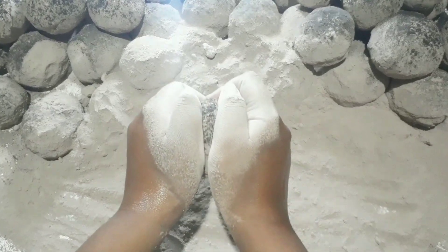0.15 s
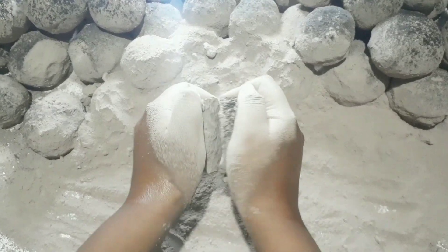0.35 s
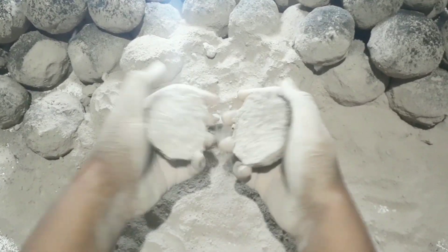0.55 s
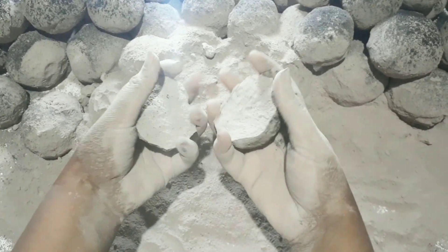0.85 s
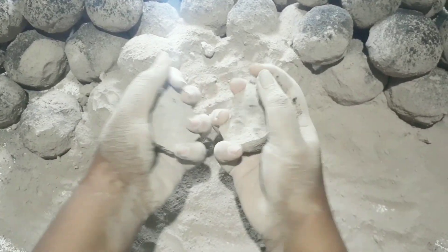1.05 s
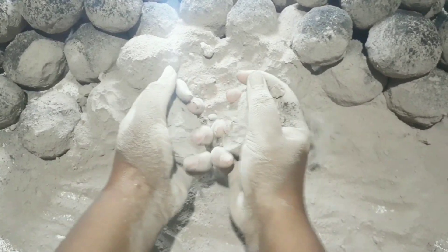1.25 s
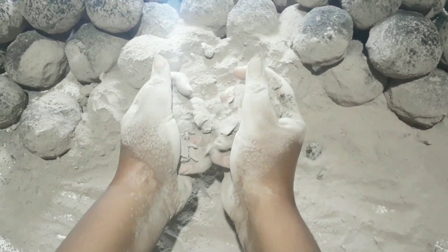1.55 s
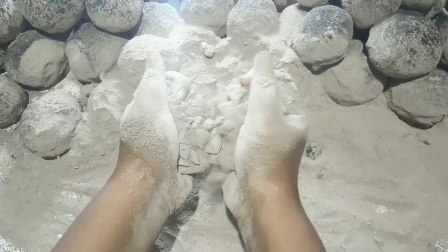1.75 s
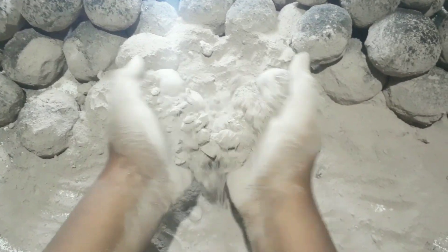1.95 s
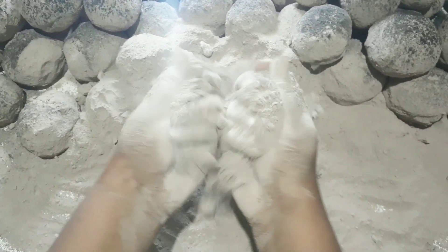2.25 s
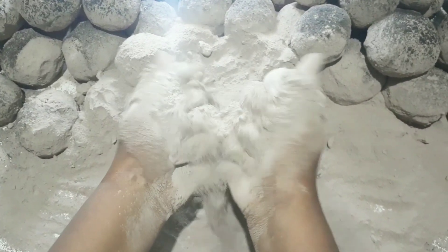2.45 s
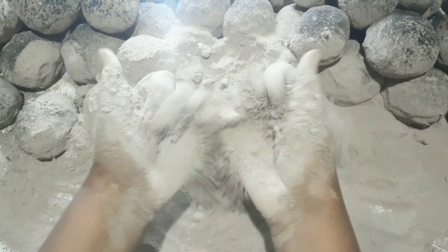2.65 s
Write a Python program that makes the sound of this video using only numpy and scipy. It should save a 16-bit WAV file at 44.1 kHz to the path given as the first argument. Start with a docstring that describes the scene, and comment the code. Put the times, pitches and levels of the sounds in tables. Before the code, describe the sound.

Dry chalk broken with a soft low thud and crushed to crumbs while a cricket chirps fast

```python
"""In a small, echoing space with a soft hiss, hands break a chalk ball with a dull thump, then crush the halves.
Cracks and falling crumbs are noise pulses that ring the resonances of hands, chalk and heap, with powdery hiss.
Decaying noise makes the boom of the split, and a band of grainy noise makes a brief high rustle.
A cricket chirps steadily close by and others trill further off: short sine bursts that sag in pitch.
"""
import sys
import numpy as np
from scipy import signal
from scipy.fft import rfft, irfft, next_fast_len
from scipy.io import wavfile

SR = 44100
rng = np.random.default_rng(int(sys.argv[2]) if len(sys.argv) > 2 else 0)


def wav_record(signal):
    """Record a signal, one row per channel, as 16-bit PCM in the file named by sys.argv[1]."""
    frames = np.transpose(np.atleast_2d(signal))
    bounded = np.clip(frames, -1, 1)
    # unit amplitude maps onto the largest positive 16-bit level
    quanta = np.round(bounded * 32767).astype(np.int16)
    wavfile.write(sys.argv[1], SR, quanta)


N = 123479  # length in samples

# Separate cracks: t/s, then relative level/dB of dust, thud, knock, crunch, crisp
CRACKS = [(0.201, -2, -7, -15.5, -28, -59), (0.997, -27, -48, -44, -46.5, -50.5),
          (1.095, -17, -32, -33.5, -51, -56), (1.13, -17, -27.5, -46, -33.5, -48),
          (1.151, -23, -33, -54, -41.5, -43), (1.268, -10, -21, -29, -27.5, -37),
          (1.327, -6, -28.5, -30, -25.5, -41), (1.407, -15, -25, -28.5, -32, -33),
          (1.48, -22.5, -30, -33, -34.5, -33), (1.509, -12, -33, -35, -33, -36),
          (1.625, -35, -24, -20, -27, -25), (1.654, 2, -23, -35, -33, -39),
          (1.885, -5, -28.5, -26.5, -28.5, -41), (1.919, -23, -39, -24.5, -47, -47.5),
          (1.969, -1, -42, -30.5, -34.5, -32), (2.026, -17.5, -38.5, -38, -33.5, -30.5),
          (2.059, -17, -58, -47, -29, -38), (2.119, -9, -49, -39, -29.5, -40.5),
          (2.151, -15, -44, -27, -24, -49), (2.235, -14, -48, -44, -37, -28.5),
          (2.276, -16, -44, -46, -36, -24.5), (2.298, -3, -60, -21, -21.5, -38),
          (2.375, -4, -29.5, -20, -17, -37), (2.441, -8, -63, -24, -28, -22),
          (2.459, 8, -60, -37, -30.5, -34.5), (2.485, -9, -48, -35, -44, -29.5),
          (2.534, -18.5, -49, -26.5, -43, -32), (2.565, 3, -31, -30, -35, -33),
          (2.599, -36, -29, -47, -43, -42), (2.707, -22, -46, -33.5, -39, -53),
          (2.759, -27, -51, -45, -37, -56)]
# Stream of falling crumbs: t/s, then relative level/dB of thud, knock, crunch, crisp
CRUMBLE = [(0.6, -62.5, -73, -76, -75), (0.62, -57, -71, -66, -56.5), (0.75, -61, -59, -52.5, -55.5),
           (0.98, -62, -64, -74, -63.5), (1.0, -46, -57, -53, -42), (1.07, -52, -73, -75, -76),
           (1.09, -34, -37, -51, -58), (1.15, -35, -40.5, -40, -46.5), (1.25, -43, -54, -66, -61),
           (1.27, -40.5, -25.5, -34.5, -26.5), (1.45, -34, -44, -38.5, -50.5),
           (1.51, -26, -46, -24.5, -27.5), (1.6, -54, -40, -47.5, -48), (1.63, -22, -19, -25, -27),
           (1.68, -33.5, -35.5, -40.5, -40.5), (1.79, -43, -42, -48.5, -34), (1.87, -55, -47, -41, -40.5),
           (1.88, -39, -33, -37, -34.5), (2.04, -43, -40.5, -42, -36), (2.18, -48, -31, -31.5, -42.5),
           (2.27, -38, -42, -45, -42), (2.29, -62, -29.5, -25, -31), (2.39, -31, -21.5, -24, -35),
           (2.42, -50, -52, -58, -35), (2.44, -37.5, -29, -28, -31.5), (2.64, -37, -39, -35, -37.5),
           (2.77, -41.5, -30, -46.5, -48.5), (2.8, -50, -49, -43, -62)]
# Resonances of hands, chalk and heap, grouped as thud, knock, crunch, crisp: f/Hz, width/Hz, relative level/dB
BODY = [
    [(90, 50, -9.5), (164.6, 42, 0.5), (225, 54.7, 0.5), (290, 60, -8)],
    [(356, 110, 1), (478, 97, 8), (609, 136, 1)],
    [(694.4, 187, 6.5), (952, 165, 5.5), (1232, 167, 2)],
    [(1404, 276, 4), (1845, 129, 3.5), (1990, 254, -2)],
]
# Boom as the ball splits, one row per resonance group: level/dB, time to fall 60 dB: t60/s
BOOM = [(-18, 0.66), (-25.5, 0.42), (-38.5, 0.17), (-51, .2)]
# Brief high rustle: t/s, level/dB
RUSTLE = [(2.25, -66), (2.28, -42), (2.4, -42), (2.46, -67.5), (2.8, -62)]
# Echo of the space: f/Hz, time to fall 60 dB: t60/s
ROOM = [(60, .7), (170, .4), (480, .35), (1000, .2), (2500, 0.31), (7000, .15)]
# Chirps of the near cricket: t/s, main level/dB, lead-in stroke level/dB
CHIRPS = [(0.0857, -20.5, -35), (0.2064, -20, -30), (0.327, -21, -29), (0.4466, -21, -26),
          (0.5648, -20.5, -30), (0.687, -21, -36), (0.8124, -19.5, -28), (0.9383, -23, -25),
          (1.0593, -22.5, -25), (1.1778, -22, -34), (1.2968, -21, -32), (1.4123, -19, -28),
          (1.5304, -19, -28.5), (1.6495, -20.5, -29.5), (1.7683, -20.5, -28), (1.891, -21.5, -29),
          (2.0128, -20, -34), (2.1498, -23, -32.5), (2.283, -21, -27.5), (2.4074, -20.5, -30),
          (2.534, -22, -26), (2.6528, -21, -29), (2.7737, -20, -28)]
# Lead-in stroke: t/s after the chirp time, length/s, sag/Hz
LEAD_IN = (-.021, .009, 500)
# Main stroke and its drawn-out aftersound: t/s after the chirp time, length/s, level/dB over the chirp, sag/Hz
STROKES = [(-.002, 0.0091, -0.5, 700), (.011, .018, -8.5, 100), (.022, .019, -11, 200),
           (.06, .02, -22, 200)]
# Pitches of the far crickets, one each: f/Hz
CHORUS_HZ = (6340, 6440, 6500, 6670)
# Tone colour of the background hiss: f/Hz, relative level/dB per Hz
HISS = [(18, -52.5), (30, -39), (50, -7.5), (127, -9), (160, -17.5), (450, -22.5), (900, -27.5),
        (2000, -29), (2800, -30), (4500, -27), (5800, -18.5), (7300, -18), (9800, -19.5), (10200, -23.5),
        (11500, -24), (11900, -28.5), (16000, -28.5)]
# Slow swell of the hiss: t/s, relative level/dB
AIR = [(0.0, -45.5), (0.6, -46.5), (1.04, -45), (2.34, -45.5), (2.5, -45), (2.8, -46.5)]
# How alike left and right are in the hiss: f/Hz, likeness (1 = same)
ALIKE = [(60, 1), (270, 0.99), (740, 0.4), (2000, 0.29), (3300, 0.24), (6000, 0.82), (9000, 0.47),
         (15000, 0.089)]

CRACK_DELAY_S = .003  # each crack sounds this long after its listed time
CRACK_DB, SPLINTERS_DB = 25, -9  # a crack sets off a short burst of splinters
SPLINTERS_S = 0.0069  # the splinters fall 9 dB in this time
GRAINS_PER_S, GRAIN_SPREAD_DB, CRUMBLE_DB = 1600, 2.5, -4.5
POWDER_HZ, POWDER_DB, POWDER_T60_S = 3000, -36, .151  # hiss above this frequency at each crack
BOOM_S, BOOM_HOLD_S = .212, 0.038  # start, and time before it dies away
RUSTLE_HZ, RUSTLE_WIDTH_HZ = 4850, 730
WING_HZ, SAG_POWER = 6675, 6  # a high power keeps the pitch drop at the very end of a stroke
STROKE_SCATTER_DB, STROKE_SCATTER_S = 1.5, .001
CHORUS_PER_S, CHORUS_SPREAD_HZ, CHORUS_SAG_HZ, CHORUS_DB = 96, 8, 200, -40.5
HISS_DB = -41
ROOM_DB, CRICKET_WET_DB = 7, 3  # echo level for the hands and for the near cricket
WIDTH_DB, CRICKET_WIDTH_DB = -18, -9  # left-right difference fed to the echo, hands and cricket
TOP_HZ = 15840


def amp(db):
    """Turn decibels into a plain factor."""
    return 10 ** (np.asarray(db) / 20)


def unit(x):
    """Scale to an average (RMS) level of 1."""
    return x / np.sqrt(np.mean(x ** 2) + 1e-20)


def along(points, hz):
    """Read a curve of (f/Hz, value) points on a log frequency axis."""
    f, v = np.transpose(points)
    return np.interp(np.log(hz + 1), np.log(f + 1), v)


def over_time(points, **ends):
    """Read a curve of (t/s, value) points at every sample."""
    return np.interp(np.arange(N) / SR, *np.transpose(points), **ends)


def filtered(x, response):
    """Multiply the spectrum of x by a complex response of frequency."""
    m = next_fast_len(N + SR // 2)
    return irfft(rfft(x, m) * response(np.fft.rfftfreq(m, 1 / SR)), m)[..., :N]


def ring(modes):
    """Resonances that ring after each push, with steep skirts; white noise keeps its level."""
    low_hz, high_hz = .6 * modes[0][0], 1.2 * modes[-1][0]

    def response(f):
        # neighbouring resonances have opposite signs
        peaks = sum((-1) ** k * amp(db) * 1j * f * width / (hz * hz - f * f + 1j * f * width)
                    for k, (hz, width, db) in enumerate(modes))
        low_cut = 1j * f / (low_hz + 1j * f)
        high_cut = 1 / (1 - np.square(f / high_hz) + np.sqrt(2) * 1j * f / high_hz)
        steep = peaks * np.square(low_cut * high_cut)
        return steep / np.sqrt(np.mean(abs(steep) ** 2))

    return response


def chalk():
    """Cracks and a stream of crumbs excite four groups of resonances; powder hisses at each crack."""
    s = np.arange(SR // 16) / SR
    sizes = amp(GRAIN_SPREAD_DB * rng.exponential(size=N)) * rng.choice([-1, 1], N)
    grains = unit(sizes * (rng.random(N) < GRAINS_PER_S / SR))
    at, *flow_db = np.transpose(CRUMBLE)
    pushes, powder = np.zeros((4, N + len(s))), np.zeros(N + len(s))
    for push, db in zip(pushes, flow_db):
        level_db = over_time(np.transpose([at, db]), left=db[0] - 30)
        push[:N] = grains * amp(CRUMBLE_DB + level_db)
    for at, dust_db, *levels_db in CRACKS:
        i = round((at + CRACK_DELAY_S) * SR)
        sparse = rng.standard_normal(len(s)) * (rng.random(len(s)) < .03)
        burst = amp(SPLINTERS_DB - 9 * s / SPLINTERS_S) * sparse
        burst[0] = -1  # the crack itself
        pushes[:, i:][:, :len(s)] += amp(np.add(levels_db, CRACK_DB))[:, None] * burst
        fade = amp(dust_db + POWDER_DB - 60 * s / POWDER_T60_S)
        powder[i:][:len(s)] += fade * rng.standard_normal(len(s))
    dust = filtered(powder[:N], lambda f: (1j * f / (POWDER_HZ + 1j * f)) ** 2 / (1 + 1j * f / 8000) ** 2)
    return dust + sum(filtered(push[:N], ring(modes)) for push, modes in zip(pushes, BODY))


def boom():
    """Noise in the same resonances holds, then dies away; the lowest group lasts longest."""
    t = np.arange(N) / SR - BOOM_S
    noise = rng.standard_normal(N) * (t > 0)
    dying_s = np.maximum(t - BOOM_HOLD_S, 0)
    return sum(filtered(noise * amp(db - 60 * dying_s / t60), ring(modes))
               for (db, t60), modes in zip(BOOM, BODY))


def rustle():
    """Sparse random clicks, narrowed to one high band, make a grainy noise."""
    clicks = rng.standard_normal(N) * (rng.random(N) < .05)
    band = filtered(clicks, lambda f: 1 / (1 + ((f - RUSTLE_HZ) / RUSTLE_WIDTH_HZ) ** 2) ** 2)
    return amp(over_time(RUSTLE, left=-90)) * unit(band)


def strokes(rows):
    """Each wing stroke (t/s, length/s, level/dB, f/Hz, sag/Hz) is a sine burst that sags at its end."""
    out = np.zeros(N + 2 * SR)  # a spare second at both ends
    for at, length, db, hz, sag_hz in rows:
        i = round(at * SR)
        u = np.arange(round(length * SR)) / (length * SR)  # 0 to 1 through the stroke
        phase = 2 * np.pi * (np.cumsum(hz - sag_hz * u ** SAG_POWER) + i * hz) / SR
        out[i + SR:][:len(u)] += amp(db) * np.sin(np.pi * u) * np.sin(phase)
    return out[SR:SR + N]


def cricket():
    """Every chirp plays a lead-in and the same wing strokes, the later ones a little varied."""
    rows = []
    lead_lag, lead_length, lead_sag = LEAD_IN
    for at, chirp_db, lead_db in CHIRPS:
        rows.append((at + lead_lag, lead_length, lead_db, WING_HZ, lead_sag))
        for k, (lag, length, db, sag) in enumerate(STROKES):
            late, louder = rng.standard_normal(2) * (k > 0)  # the main stroke stays exact
            rows.append((at + lag + STROKE_SCATTER_S * late, length,
                         chirp_db + db + STROKE_SCATTER_DB * louder, WING_HZ, sag))
    return strokes(rows)


def chorus():
    """Far crickets: wing strokes at random times overlap, the louder ones a touch higher in pitch."""
    rows = []
    for when, long, loud, who in rng.random((round(CHORUS_PER_S * N / SR), 4)):
        hz = CHORUS_HZ[int(len(CHORUS_HZ) * who)] + CHORUS_SPREAD_HZ * loud
        rows.append((when * N / SR, .008 + .012 * long, 6 * loud, hz, CHORUS_SAG_HZ))
    return amp(CHORUS_DB) * unit(strokes(rows))


def room(x):
    """Echo: each frequency dies at its own speed; the noise tail differs every third of a second."""
    out, step = np.zeros(N + 2 * SR), SR // 3
    for i in range(0, N, step):
        hz, t, z = signal.stft(rng.standard_normal(SR // 2), SR, nperseg=512)
        t60 = along(ROOM, hz)[:, None]
        tail = signal.istft(z * amp(-60 * t / t60) / np.sqrt(t60 * SR), SR, nperseg=512)[1]
        wet = signal.fftconvolve(x[i:i + step], tail)
        out[i + 250:][:len(wet)] += wet  # the echo starts 250 samples late
    return out[:N]


def hiss():
    """Background noise, shared between left and right by frequency; it swells a little."""
    def mid_and_side(hz):
        turn = np.arccos(np.clip(along(ALIKE, hz), -1, 1)) / 2
        return amp(along(HISS, hz)) * [np.cos(turn), np.sin(turn)]

    mid, side = filtered(rng.standard_normal((2, N)), mid_and_side)
    swell_db = over_time(AIR)
    return amp(HISS_DB + swell_db - swell_db.mean()) * unit(np.array([mid + side, mid - side]))


def scene():
    """Direct sounds sit in the middle; the echo and the hiss spread left and right."""
    hands, insect = chalk() + rustle(), cricket()
    echo = room(amp(ROOM_DB) * hands + amp(CRICKET_WET_DB) * insect)
    mid = hands + boom() + insect + chorus() + echo
    side = room(amp(WIDTH_DB) * hands + amp(CRICKET_WIDTH_DB) * insect)
    return np.array([mid + side, mid - side]) + hiss()


def record(dry):
    """Keep nothing above the band limit."""
    return filtered(dry, lambda hz: hz < TOP_HZ)


dry = scene()
out = record(dry)
wav_record(out)
```